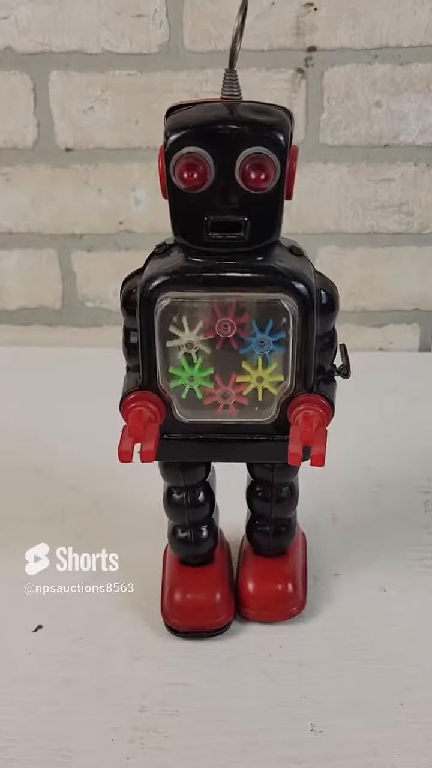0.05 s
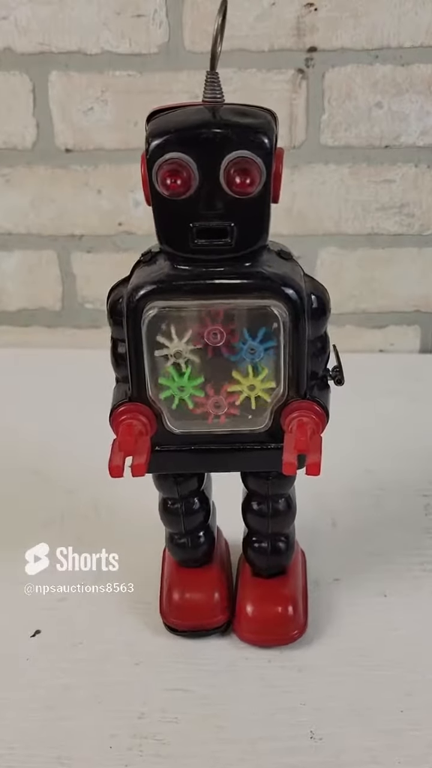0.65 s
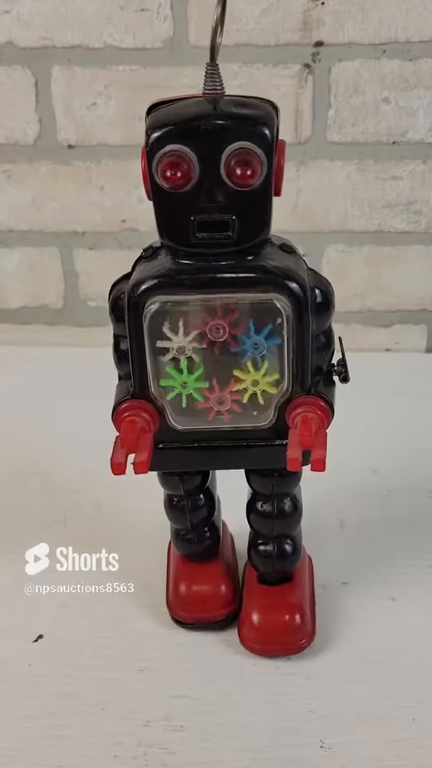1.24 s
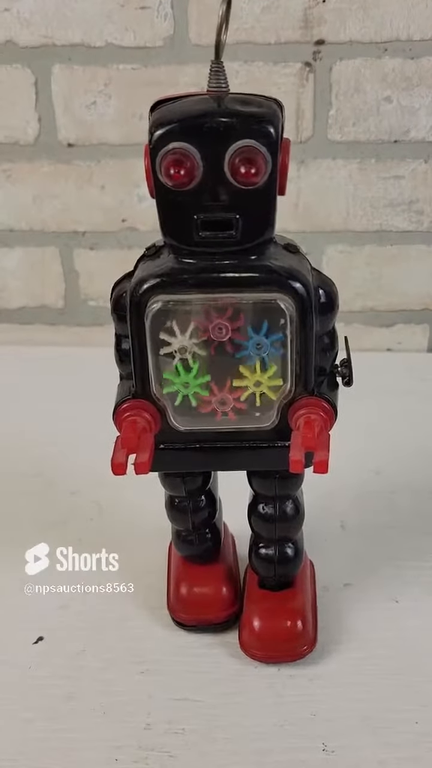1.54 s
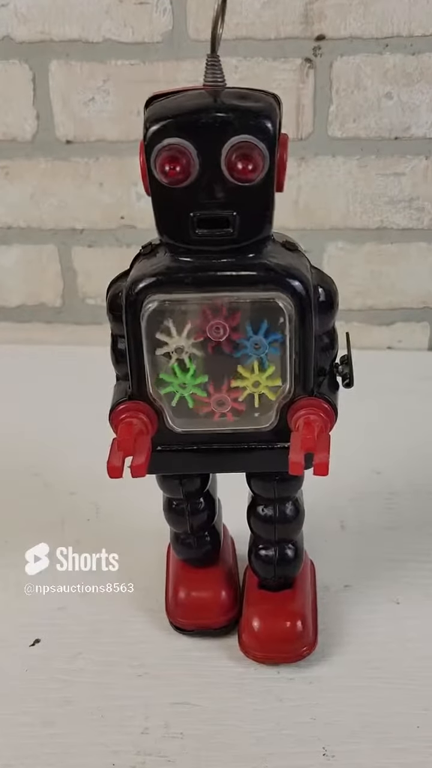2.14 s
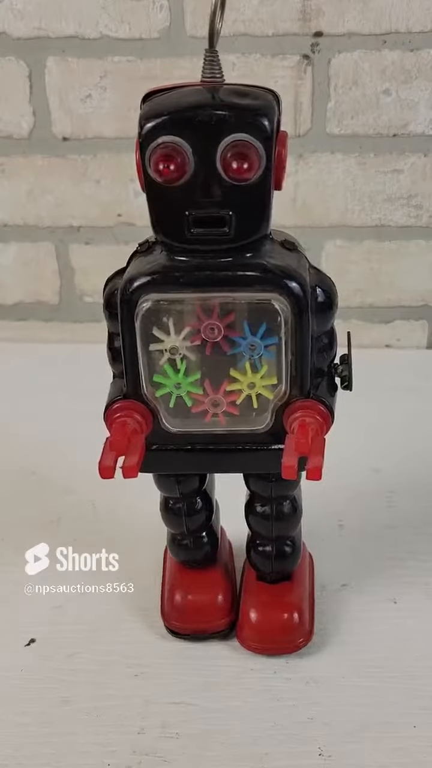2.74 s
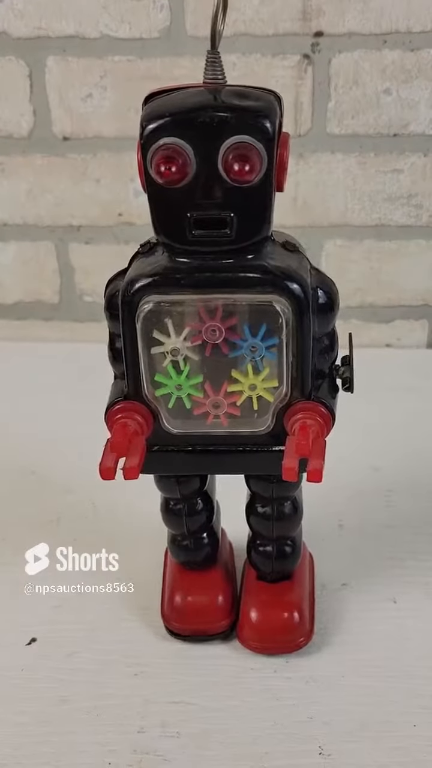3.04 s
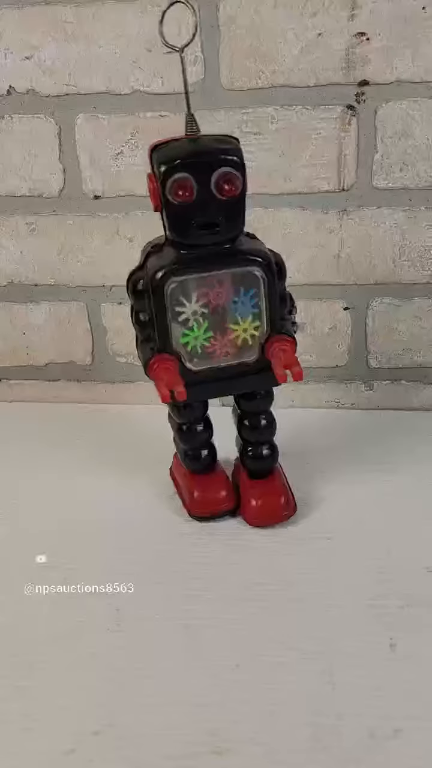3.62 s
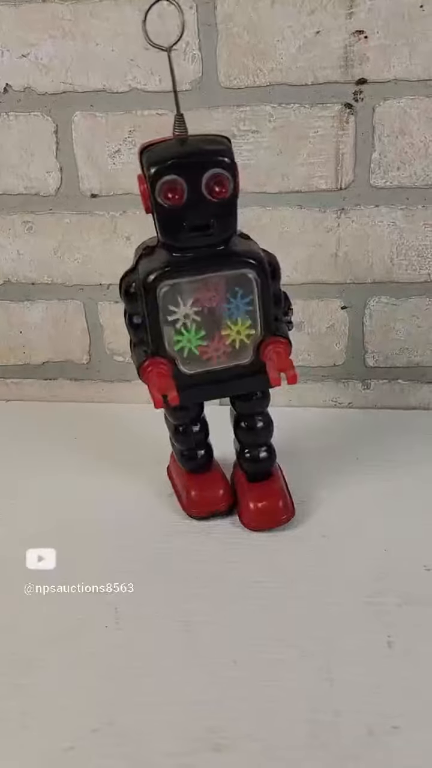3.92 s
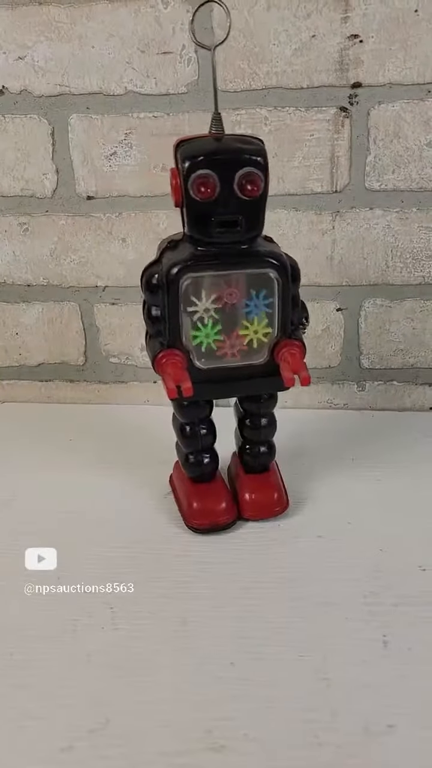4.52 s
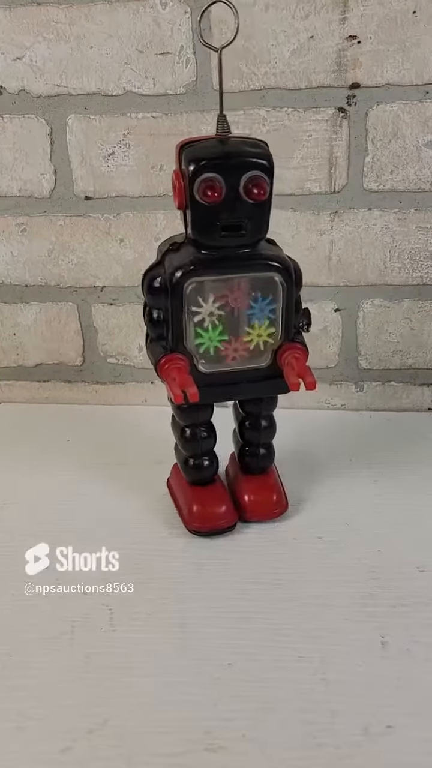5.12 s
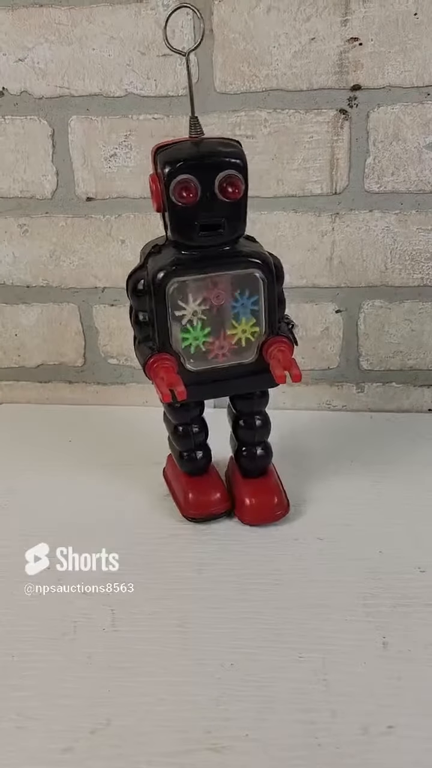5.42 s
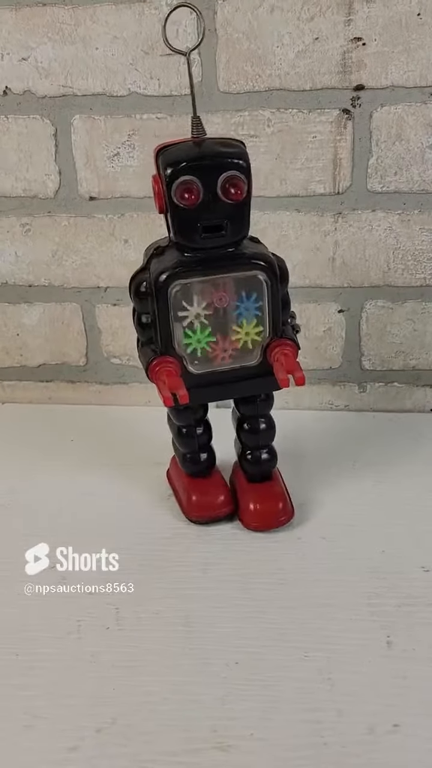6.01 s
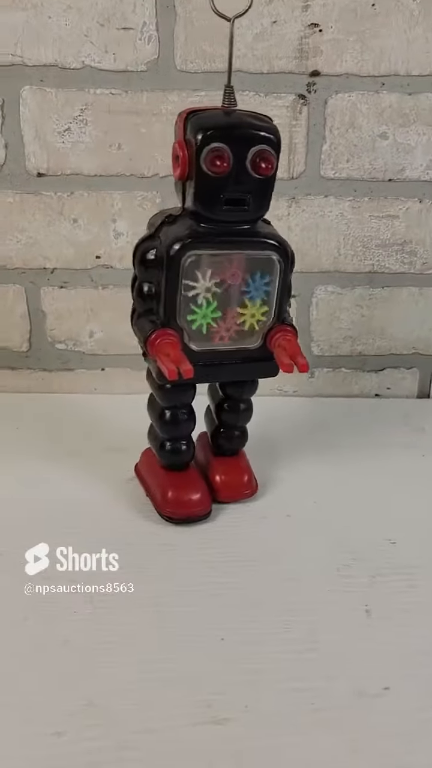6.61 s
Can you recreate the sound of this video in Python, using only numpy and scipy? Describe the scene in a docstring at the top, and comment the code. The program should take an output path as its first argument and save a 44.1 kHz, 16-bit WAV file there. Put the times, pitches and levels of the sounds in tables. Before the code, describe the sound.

Close by in a quiet, faintly humming room, the clockwork of a tin toy robot rattles and ticks while a loose metal part pings. The spring runs out and the gears drag to a stop. After a short pause the mechanism starts again at about twice the speed, a louder, brighter buzzing whirr that hums softly through the tabletop. A hollow foot knocks once and the gears keep running.

```python
"""Tabletop in a quiet, humming room: a wind-up tin robot walks, runs down and stalls. The sound drops out
briefly and the scene changes: it runs again, much faster. Gear teeth strike in step with a spinning governor
and rattle the tin shell; the governor's shake hums in the table. A loose metal part pings very high, a linkage
catches, and twice a hollow foot knocks on the table."""
import sys
import numpy as np
from scipy import signal
from scipy.fft import rfft, irfft, next_fast_len
from scipy.io import wavfile
from scipy.ndimage import uniform_filter1d

SR = 44100
rng = np.random.default_rng(int(sys.argv[2]) if len(sys.argv) > 2 else 0)


def log_audio(samples):
    """Write samples as a 16-bit WAV file to the path given in sys.argv[1]."""
    # one column per channel
    frames = np.atleast_2d(samples).T
    # limit to full scale, then quantise
    limited = np.clip(frames, -1, 1)
    pcm = np.round(limited * 32767).astype(np.int16)
    wavfile.write(sys.argv[1], SR, pcm)


N = 302526
T = np.arange(N) / SR
NFFT = next_fast_len(N + SR // 4, real=True)
BIN_HZ = np.maximum(np.arange(NFFT // 2 + 1) * SR / NFFT, 1)
MUTE_START_S, MUTE_END_S = 3.601, 3.681
LABOUR_HZ = 51.7  # governor labours below this speed

# Table levels are relative.
# spent spring: t/s, governor speed/Hz, level/dB
SLOW_DRIVE = [(0, 80.17, -38.5), (0.131, 77.2, -38.5), (0.248, 70.93, -40.5), (0.5, 62.14, -40),
              (0.65, 58.8, -41.5), (0.85, 59.58, -41), (1.1, 60.47, -41.5), (1.649, 72.18, -40.5),
              (1.9, 69.67, -42), (2.3, 58.35, -41), (2.47, 51.73, -46.5), (2.6, 42.13, -48.5),
              (2.8, 25, -53), (2.951, 24.23, -58.5)]
# gear noise slope: f/Hz, left/dB, right/dB
SLOW_SLOPE = [(400.0, -44.5, -36.0), (820.0, -39.5, -34.5), (1330.0, -36.5, -35.5), (1900.0, -40, -32.0),
              (2980, -31.5, -25.5), (4600.0, -35, -26), (6940, -30.5, -24.5), (7900.0, -29.5, -33),
              (8370, -24.5, -27), (9500, -35, -27), (11250, -25.5, -29.5), (12700.0, -26.5, -20),
              (14500.0, -25.5, -27), (15700.0, -39.5, -34.0)]
FAST_SLOPE = [(387, -33.5, -26.5), (840, -33.5, -34.5), (1370, -26, -20.5), (1910, -30, -24.5),
              (3020, -21.5, -19.5), (4600.0, -19, -12.5), (6900.0, -22.5, -19.5), (7960, -21, -18.5),
              (8840, -15.0, -18.5), (9700, -18.5, -18.0), (11730, -18, -21), (12800, -14.5, -11.0),
              (14500.0, -14, -19), (15700.0, -19.0, -32)]
# shell modes: f/Hz, width/Hz, slow left/dB, slow right/dB, fast left/dB, fast right/dB
SHELL_MODES = [(519, 46, 7, 5, 5.5, 4), (995, 140, 6.5, 2.5, 4.5, 7.5), (1141, 108, 13, 17.5, 5.5, 17),
               (1638, 217, 10.5, 7.5, 8, 8.0), (2080, 130.0, 9.5, 5.5, 3, -2.5),
               (2120, 90.0, 2.5, -10, 7.5, 3.5), (2390, 190, 3.0, 4.5, -4, 1),
               (2826, 200.0, 7.5, 4.5, 5, 5), (3150, 91, 5, -4.5, 15, 8), (3330, 78, 9.5, 11, 8, 9),
               (3780, 180, -1.0, 5.5, 4, -3.5), (3947, 180.0, 7, 7.5, 7.5, 8.5),
               (4104, 50.0, 0.5, 2.5, -7, 9.5), (4284, 184, 4, 5, 3, 8), (4580, 83, 3, 7.5, -3, 3),
               (4770, 170, 1, 2.5, 2.5, -1.5), (5045.0, 61, -3, 9.5, 7, 4.5), (5366, 190, 4.5, 5.5, 4, 7.5),
               (5780.0, 270, 5.5, -2.5, -6, 7), (6070, 160, -0.5, 3.5, 5, 4.5),
               (6220.0, 275, 4.5, 9.5, 4, 8), (6640, 165, -1.5, 1, 8, 7.0), (7380, 390, 5.5, 5.5, 6.5, 5.5)]
# thin high rings of the tin body and its loose metal part: same columns
HIGH_RINGS = [(10691, 28, 1, 0, 5, 7), (12798, 38, 3, 3, 4, 4), (13847, 60, 8, 10, 10, 12),
              (15343, 28, 13, 11, 11.5, 7)]
# shell modes common to both sides: f/Hz, width/Hz, coherence/0-1, left lead/rad
SLOW_COHERENCE = [(1090, 170, 0.98, -0.03), (1540, 190, 0.5, .6), (2030, 170, 0.25, -1),
                  (2910, 230, 0.7, 1.6), (3270, 230, 0.8, -1.7), (5430, 250, .6, -0.2),
                  (6300, 500, 0.37, 2.5), (8280, 280, 0.7, 3.5), (11450, 500, .65, 0.8)]
FAST_COHERENCE = [(1000, 430, 0.92, 0), (1720, 520, 0.85, 0.37), (3290, 530, .72, -3.5),
                  (4150, 840, .7, -1.73), (5230, 220, .55, -3), (6150, 500, .45, -3), (9400, 400, 0.56, 3),
                  (13000, 360, 0.69, 0)]
# chest panel buzz: t/s, level/dB re gear treble
SLOW_CHEST_BUZZ = [(0.1, -11), (0.4, -13), (0.53, -8.5), (0.65, -11.5), (0.8, -11.5), (1.05, -12),
                   (1.55, -11.5), (2.0, -10), (2.25, -10.5), (2.9, -16)]
FAST_CHEST_BUZZ = [(3.7, -13.5), (3.95, -16.5), (4.15, -14), (4.4, -12), (4.6, -8), (4.85, -15.5),
                   (5.1, -10.5), (5.55, -17.5), (5.95, -12), (6.2, -13), (6.85, -13.5)]
# gear plate rasp: t/s, level/dB re gear treble
SLOW_PLATE_RASP = [(0, -7), (0.3, -4.5), (0.55, -5.5), (0.9, -7.5), (1.3, -10), (2.2, -6.5), (2.9, -9)]
# tabletop response: f/Hz, level/dB
TABLETOP = [(50, -50), (115, -2), (165, 6), (235, 0), (315, -2.5), (400, -15), (640, -29), (1000, -50)]
# room noise: f/Hz, level/dB
ROOM_SLOPE = [(20, -28), (45, -3), (88, -4), (125, -5.5), (190, -12.5), (270, -15.5), (430, -26),
              (620, -22), (900, -33), (1600, -30), (4000, -38.5), (7000, -44.5), (10300, -55.5),
              (13000, -49)]
# room modes: f/Hz, width/Hz, lift/dB
ROOM_RESONANCES = [(516, 18, 13), (674, 45, 5.5), (1004, 24, 16.5), (1203, 86, 12), (1430, 93, 13),
                   (1730, 60, 10.5), (2010, 73, 5.5), (2280, 200, -6.5), (2580, 290, 7), (5060, 710, 4)]
# appliance hum: f/Hz, level/dB, waver/dB
HUM_PARTIALS = [(58.6, -60.5, 2.8), (121.1, -54.5, 2.1), (177.9, -59.5, 4.3), (239, -66, 1.8)]
# hard knocks on the loose part: t/s, level/dB, free ring/s
HARD_KNOCKS = [(.022, -31, .04), (.068, -36, 0.028), (.288, -30, .028), (.332, -32, .02), (.359, -30, .025),
               (0.39, -32, 0.021), (.484, -31, .014), (.597, -32, .017), (.691, -37, .012),
               (.724, -28, 0.02), (.78, -33, .014), (.932, -29, 0.033), (.957, -26, 0.029),
               (1.073, -32, .015), (1.114, -30, 0.024), (1.279, -29, 0.038), (1.321, -28, 0.022),
               (1.38, -26.5, 0.022), (1.411, -25, .025), (1.442, -27.5, .024), (1.528, -31, .02),
               (1.56, -28, 0.02), (1.599, -33, .017), (1.669, -28, .021), (1.699, -28, .031),
               (1.78, -33, 0.041), (1.829, -28, .017), (1.852, -35, .02), (1.914, -35, 0.017),
               (1.943, -27, 0.037), (1.983, -28, .016), (2.014, -30, 0.024), (2.057, -30, .017),
               (2.087, -28.5, 0.018), (2.232, -32, .014), (2.252, -34, .04), (2.297, -30, 0.018),
               (2.365, -32, .016), (2.402, -32, .012), (2.457, -33, .014), (2.482, -37, .013),
               (2.635, -40, .009), (2.681, -43, .01), (2.8, -45, 0.011), (4.25, -28, .03),
               (4.9696, -28, .03), (6.511, -25, .03), (6.817, -28, .03)]
# linkage catches: t/s, level/dB
LINKAGE_CATCHES = [(.218, -23), (0.477, -15), (0.494, -17), (0.6363, -14), (0.6883, -15.5), (0.723, -16),
                   (0.868, -15), (1.012, -30), (1.063, -18), (1.351, -16.5), (1.38, -22), (1.4136, -14.5),
                   (1.442, -21), (1.53, -20), (1.648, -24), (1.698, -19), (1.83, -22), (1.944, -13),
                   (2.086, -24), (2.148, -21), (2.309, -16), (2.336, -25), (2.386, -21), (2.4062, -16.5),
                   (2.447, -17.5), (2.468, -19), (2.484, -26), (2.549, -28), (2.586, -24), (2.638, -33),
                   (2.6802, -29), (2.8005, -30), (2.883, -45), (2.927, -40), (3.841, -15), (4.793, -8),
                   (5.673, -10), (6.085, -8)]
# body rocks onto a foot: t/s, ring/dB, crack/dB
FOOTFALLS = [(2.6796, -29, -15), (5.3207, -5.5, -4.5)]
# foot modes: f/Hz, level/dB, t60/s
FOOT_MODES = [(1115, -13, 0.033), (1148, 1.5, 0.029), (1570, -19, 0.046), (1720, -15, 0.043)]
# foot crack: f/Hz, level/dB
CRACK_SLOPE = [(300, -13), (900, 2), (1700, 9), (2300, 0), (3200, 3), (6000, -2), (8000, -4), (15000, -7)]
# wound spring, sagging under the steps: t/s, governor speed/Hz
FAST_GOVERNOR = [(3.7, 162.7), (4.07, 164), (4.25, 157), (4.47, 147.4), (4.87, 159.7), (5.07, 159.5),
                 (5.28, 154.6), (5.72, 161), (5.95, 160.8), (6.27, 148.4), (6.43, 148.5), (6.57, 154),
                 (6.85, 155.5)]
# its force on the gears: t/s, level/dB
FAST_DRIVE = [(3.7, -32.5), (4.12, -32), (4.42, -34), (4.6, -32.5), (4.9, -32), (5.28, -32.5), (5.72, -32),
              (6.02, -32.5), (6.28, -32), (6.55, -33.5), (6.85, -32)]
# body turning side to side: t/s, left minus right/dB
BODY_SWAY = [(3.7, 0), (3.88, -0.6), (4.14, -0.3), (4.38, 0.35), (4.65, -0.06), (5, 0.15), (5.25, 0.3),
             (5.85, 0), (6.18, -0.24), (6.55, -0.1)]
# foot pressing on the table: t/s, level/dB
FOOT_PRESSES = [(3.77, -43), (4.0, -41), (4.6, -40), (4.78, -53), (5.03, -57), (5.42, -47), (5.79, -42),
                (6.25, -44), (6.6, -46), (6.77, -52)]


def amp(db):
    """dB to gain."""
    return 10 ** (np.asarray(db) / 20)


def curves(rows):
    """Table columns, interpolated per sample."""
    times_s, *columns = np.transpose(rows)
    return [np.interp(T, times_s, c) for c in columns]


def spectrum(rows):
    """Table columns, interpolated per bin."""
    hz, *columns = np.transpose(rows)
    return np.array([np.interp(np.log(BIN_HZ), np.log(hz), c) for c in columns])


def resonance(hz, width_hz):
    """Bell over frequency, peak 1."""
    return 1 / (1 + (2 * (BIN_HZ - hz) / width_hz) ** 2)


def colour(x, db):
    """Minimum-phase filter from the folded cepstrum."""
    cepstrum = irfft(db * np.log(10) / 20, NFFT)
    response = np.exp(rfft(2 * cepstrum[..., :NFFT // 2], NFFT) - cepstrum[..., :1])
    return irfft(rfft(x, NFFT) * response, NFFT)[..., :N]


def band(x, lo_hz, hi_hz):
    """Zero-phase band-pass."""
    return signal.sosfiltfilt(signal.butter(2, [lo_hz, hi_hz], "band", fs=SR, output="sos"), x)


def rms(x):
    """RMS of the channel mean."""
    return np.sqrt(np.mean(np.atleast_2d(x).mean(0) ** 2))


def wander(rate_hz):
    """Smooth noise, spread near 1."""
    hold = int(SR / rate_hz)
    stairs = rng.standard_normal(N)[np.arange(N) // hold]
    return 1.3 * uniform_filter1d(uniform_filter1d(stairs, hold), hold)


def clicks(times_s, sizes):
    """Impulses, each split over two samples."""
    whole, part = np.divmod(np.clip(np.asarray(times_s) * SR, 0, N - 2), 1)
    whole = whole.astype(int)
    return np.bincount(whole, sizes * (1 - part), N) + np.bincount(whole + 1, sizes * part, N)


def decay(energy, t60_s):
    """Spread energy into an exponential tail."""
    pole = np.exp(-2 * np.log(1000) / (t60_s * SR))
    return signal.lfilter([1 - pole], [1, -pole], energy + 1e-18)


def rattle(blows, t60_s, tail_db, tail_t60_s, tick_db):
    """Each blow ticks and wakes dense tin modes, different left and right."""
    energy = decay(blows ** 2, t60_s) + amp(tail_db) ** 2 * decay(blows ** 2, tail_t60_s)
    return np.sqrt(energy) * rng.standard_normal((2, N)) + amp(tick_db) * blows


def reflect(x, level_db=-8, t60_s=0.03, rock_hz=9, count=5):
    """Table and wall echoes; the mix of paths shifts as the body rocks."""
    t = T[:SR // 16]
    paths = rng.standard_normal((count, 2, len(t))) * amp(-60 * t / t60_s) * (t > .001)
    paths /= np.sqrt((paths ** 2).sum(-1, keepdims=True))
    shares = np.array([wander(rock_hz) for _ in paths])
    shares /= np.sqrt((shares ** 2).sum(0))
    echoes = sum(share * signal.oaconvolve(x, path, axes=1)[:, :N] for share, path in zip(shares, paths))
    return x + amp(level_db) * echoes


def radiate(x, coherence):
    """Near strong modes the shell moves as one: both sides share the ring."""
    left, right = rfft(x, NFFT)
    shared = sum(likeness * np.exp(1j * lead_rad - (1.7 * (BIN_HZ - hz) / width_hz) ** 4)
                 for hz, width_hz, likeness, lead_rad in coherence)
    own = np.sqrt(np.clip(1 - np.abs(shared) ** 2, 0, 1))
    return irfft(np.array([own * left + shared * right, right]), NFFT)[:, :N]


def shell_db(fast):
    """Modes of the tin body and its loose part on a broad slope; small tin radiates no bass."""
    lifts_db = sum(np.outer(db[2:] if fast else db[:2], resonance(hz, width_hz))
                   for hz, width_hz, *db in SHELL_MODES + HIGH_RINGS)
    bass_loss_db = 10 * np.log10(1 + (150 / BIN_HZ) ** 2)
    return spectrum(FAST_SLOPE if fast else SLOW_SLOPE) + lifts_db - bass_loss_db


def tooth_blows(turns, per_turn, throb_db, scatter_db):
    """Teeth strike hardest just after each governor kick; a labouring governor kicks less."""
    jitter, strength = rng.standard_normal((N // 10, 2))[:int(turns[-1] * per_turn)].T
    tooth_turns = (np.arange(len(jitter)) + .3 * jitter) / per_turn
    speed_hz = np.interp(tooth_turns, turns, np.gradient(turns) * SR)
    kick = np.minimum(speed_hz / LABOUR_HZ, 1)
    blow_db = scatter_db * np.clip(strength, -2, 2) - throb_db * kick * (tooth_turns % 1 - .5)
    return clicks(np.interp(tooth_turns, turns, T), amp(blow_db))


def gear_whirr(ring, response_db, coherence, chest_db, rasp_db):
    """Tooth rattle leaves through the shell; chest panel and gear plate buzz as the body leans."""
    whirr = colour(radiate(reflect(ring), coherence), response_db)
    whirr /= rms(band(whirr, 2500, 12000))
    chest, rasp = band(whirr, 900, 1400), band(whirr, 3650, 4750)
    return whirr + chest * (amp(chest_db) / rms(chest) - 1) + rasp * (amp(rasp_db) / rms(rasp) - 1)


def table_hum(turns, rough_db, jitter_turns, right_db=6):
    """One shove a turn drives the tabletop through the feet; overtones lean right."""
    jitter, strength = rng.standard_normal((N // 100, 2))[:int(turns[-1])].T
    times_s = np.interp(np.arange(len(jitter)) + jitter_turns * jitter, turns, T)
    shoves = clicks(times_s, amp(rough_db * strength))
    hum = colour(shoves, spectrum(TABLETOP) - 20 * np.log10(1 + (40 / BIN_HZ) ** 2))
    hum = hum + band(hum, 280, 450) * (amp([[-right_db / 2], [right_db / 2]]) - 1)
    return hum / rms(band(hum, 130, 360))


def shortfall_hz(speed_hz):
    """Governor speed lost below the labouring point."""
    return np.maximum(LABOUR_HZ - speed_hz, 0)


def binding(depth_db=-2.5, length_s=0.02):
    """Gain dip of the slow gears as the linkage tightens before each catch."""
    dips = sum(np.exp(-(2 * (T - at_s) / length_s + 1) ** 2)
               for at_s, _ in LINKAGE_CATCHES if at_s < MUTE_START_S)
    return amp(depth_db * dips)


def slow_run(hum_db=-21, labour_db_per_hz=0.33):
    """The nearly spent spring turns the gears unevenly until they stall."""
    speed_hz, level_db = curves(SLOW_DRIVE)
    chest_db, rasp_db = curves(SLOW_CHEST_BUZZ) + curves(SLOW_PLATE_RASP)
    turns = np.cumsum(speed_hz * (1 + .03 * wander(25))) / SR
    blows = tooth_blows(turns, per_turn=14, throb_db=9, scatter_db=2.3)
    ring = rattle(blows, t60_s=.011, tail_db=-6, tail_t60_s=.13, tick_db=-11)
    whirr = gear_whirr(ring, shell_db(fast=False), SLOW_COHERENCE, chest_db, rasp_db)
    # slower teeth strike softly: more mids, less treble
    whirr += np.interp(T, [2.2, 2.7], [0, .35]) * band(whirr, 1505, 3800)
    whirr -= np.interp(T, [2.4, 2.85], [0, .55]) * band(whirr, 4500, 15000)
    whirr *= binding() * amp(-2.6 + 0.3 * wander(40))
    hum = table_hum(turns, rough_db=3, jitter_turns=.04) * amp(2.5 * wander(14))
    hum *= amp(hum_db + labour_db_per_hz * shortfall_hz(speed_hz))
    stall = np.interp(T, [2.84, 2.98], [1, 0])
    return (whirr + hum) * amp(level_db) * stall


def room(air_db=-52.5):
    """Near-mono rumble, hollow hiss and a wavering appliance hum."""
    spread = np.clip(BIN_HZ / 900, .13, .8)
    mid, side = rfft(rng.standard_normal((2, N)), NFFT)
    noise = (mid + spread * side * np.array([[1], [-1]])) / np.hypot(1, spread)
    lifts_db = sum(db * resonance(hz, width_hz) for hz, width_hz, db in ROOM_RESONANCES)
    air = irfft(noise * amp(spectrum(ROOM_SLOPE) + lifts_db), NFFT)[:, :N]
    hum = np.zeros(N)
    for hz, db, waver_db in HUM_PARTIALS:
        peak = np.sqrt(2) * amp(db + waver_db * wander(6.8))
        hum += peak * np.sin(2 * np.pi * hz * T + 0.58 * wander(7))
    return air / rms(air) * amp(air_db) + hum


def loose_part_knocks(count=104, gap_s=0.027, jitter_s=0.005, free_s=0.016, sag_db_per_hz=1.4):
    """Hard knocks, plus chatter that dies as the gears slow. Rows: t/s, level/dB, free ring/s."""
    run_s, speed_hz, _ = np.transpose(SLOW_DRIVE)
    hard_s, _, hard_free_s = np.transpose(HARD_KNOCKS)
    jitter, strength = rng.standard_normal((count, 2)).T
    times_s = np.abs((np.arange(count) + .5) * gap_s + jitter_s * jitter)
    sag_db = sag_db_per_hz * shortfall_hz(np.interp(times_s, run_s, speed_hz))
    level_db = -35.5 + 1.5 * strength - sag_db
    chatter = np.column_stack([times_s, level_db, np.full(count, free_s)])
    # chatter keeps clear of the hard knocks
    lag_s = times_s[:, None] - hard_s
    overlaps = ((lag_s > -0.006 - free_s) & (lag_s < hard_free_s)).any(1)
    return np.vstack([HARD_KNOCKS, chatter[~overlaps & (times_s < run_s[-1])]])


def pings(knocks, high_hz=13848, high_t60_s=0.23, low_hz=3320, low_t60_s=0.039, rise_s=0.0013):
    """The loose part rings in two modes until it touches again and is damped."""
    t, out = T[:SR // 10], np.zeros((2, N + SR))
    lead_rad = np.array([[0], [1.6]])
    high_ring = amp(-60 * t / high_t60_s) * amp([[1.5], [3]])  # left, right
    low_ring = amp(-60 * t / low_t60_s) * amp([[-15.5], [-7.5]])
    for at_s, db, free_s in knocks:
        detune, phase_rad = rng.standard_normal(2)
        envelope = (1 - np.exp(-t / rise_s)) / (1 + (t / free_s) ** 8)
        high = high_ring * np.sin(2 * np.pi * (high_hz + 5 * detune) * t + phase_rad + lead_rad)
        low = low_ring * np.sin(2 * np.pi * (low_hz + 20 * detune) * t)
        start = int(at_s * SR)
        out[:, start:start + len(t)] += amp(db) * envelope * (high + low)
    return out[:, :N]


def catches(knocks):
    """The linkage lets go with a click through the shell; the loose part's knocks tick more softly."""
    catch_s, catch_db = np.transpose(LINKAGE_CATCHES)
    knock_s, knock_db, _ = np.transpose(knocks)
    blows = clicks(catch_s, amp(catch_db)) + clicks(knock_s, amp(knock_db + 1))
    ring = rattle(blows, t60_s=.038, tail_db=-11, tail_t60_s=.12, tick_db=-28.5)
    return colour(radiate(ring, SLOW_COHERENCE), shell_db(fast=False) + 33)


def footfalls(left_db=-8, contact_s=0.014):
    """A hollow tin foot meets the table: short crack, hollow ring."""
    t = T[:SR // 8]
    modes = sum(amp(db - 60 * t / t60_s) * np.sin(2 * np.pi * hz * t) for hz, db, t60_s in FOOT_MODES)
    modes *= np.minimum(t / contact_s, 1)
    times_s, ring_db, crack_db = np.transpose(FOOTFALLS)
    ring = signal.oaconvolve(clicks(times_s, amp(ring_db)), modes)[:N]
    blows = clicks(times_s + 0.0016, amp(crack_db))
    crack = rattle(blows, t60_s=.05, tail_db=-2, tail_t60_s=.08, tick_db=-13)
    return (ring + colour(crack, spectrum(CRACK_SLOPE))) * amp([[left_db], [0]])


def settling_rub(at_s=3.135, half_width_s=0.035, level_db=-65, slips_per_s=900):
    """The stalled toy settles: faint, fine slips that grow brighter."""
    chance, size = rng.random((2, N))
    slips = band((chance < slips_per_s / SR) * (size - .5), 1000, 2200)
    brightness = np.interp(T, [at_s - half_width_s, at_s + half_width_s], [-.6, .6])
    slips += brightness * band(slips, 1550, 2200)
    return slips / rms(slips) * amp(level_db) * np.exp(-((T - at_s) / half_width_s) ** 2)


def foot_pressure(half_width_s=0.079, floor_db=-48):
    """Gain of the governor's deepest tone: a swell under each pressing foot."""
    swells = sum(amp(db) ** 2 * np.exp(-((T - at_s) / half_width_s) ** 2) for at_s, db in FOOT_PRESSES)
    return np.sqrt(amp(floor_db) ** 2 + swells)


def fast_run():
    """Freshly wound, the governor sings and the teeth merge into a bright rasp."""
    speed_hz, level_db = curves(FAST_GOVERNOR) + curves(FAST_DRIVE)
    sway_db, chest_db = curves(BODY_SWAY) + curves(FAST_CHEST_BUZZ)
    # sway left: gear plate faces away, table overtones grow
    rasp_db = -7 - 6.5 * sway_db
    overtone_db = -12 + 7.5 * sway_db
    turns = np.cumsum(speed_hz * (1 + .005 * wander(25))) / SR
    blows = tooth_blows(turns, per_turn=9, throb_db=16, scatter_db=2.5)
    ring = rattle(blows, t60_s=.018, tail_db=4, tail_t60_s=.13, tick_db=-9.5)
    whirr = gear_whirr(ring, shell_db(fast=True), FAST_COHERENCE, chest_db, rasp_db)
    whirr *= amp(0.68 + 0.5 * wander(35) + np.array([sway_db, -sway_db]) / 2)
    hum = table_hum(turns, rough_db=2.2, jitter_turns=.028)
    shake = band(hum, 125, 210)
    overtones = (hum - shake) * amp(overtone_db + 2 * wander(18))
    shake *= foot_pressure() * amp(1.4 * wander(20)) / rms(shake)
    return ((whirr + overtones) * amp(level_db) + shake) * (T > MUTE_END_S)


def scene():
    """Both runs and their small noises, in the room."""
    mix = slow_run() + fast_run() + footfalls() + settling_rub() + room()
    knocks = loose_part_knocks()
    return mix + catches(knocks) + pings(knocks)


def record(dry):
    """Brief mute between the runs; steep low-pass."""
    mute_db, cutoff_hz = -47, 15800
    muted = (T >= MUTE_START_S) & (T <= MUTE_END_S)
    gain = uniform_filter1d(np.where(muted, amp(mute_db), 1), size=64)
    return signal.sosfilt(signal.ellip(10, .2, 80, cutoff_hz, fs=SR, output="sos"), dry * gain)


dry = scene()
out = record(dry)
log_audio(out)
```